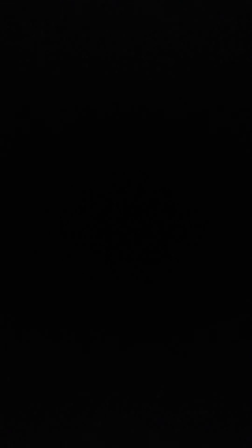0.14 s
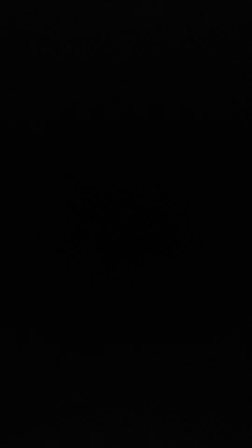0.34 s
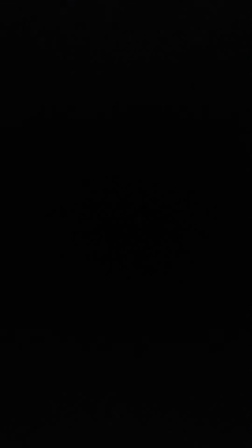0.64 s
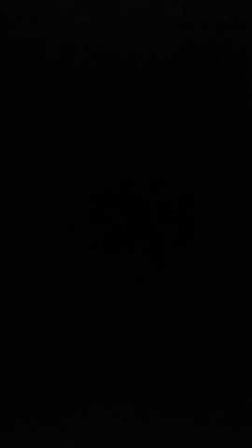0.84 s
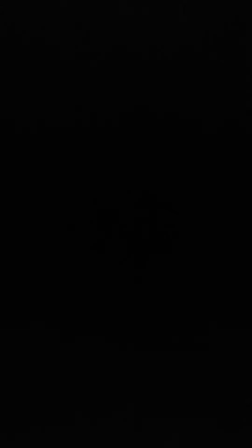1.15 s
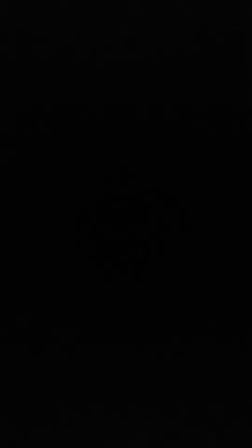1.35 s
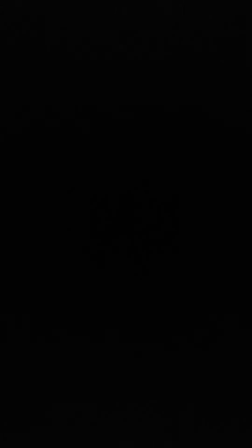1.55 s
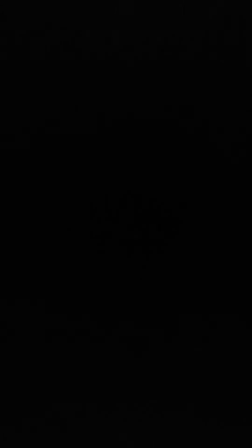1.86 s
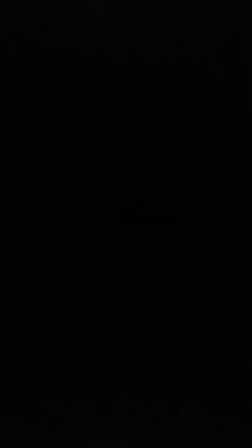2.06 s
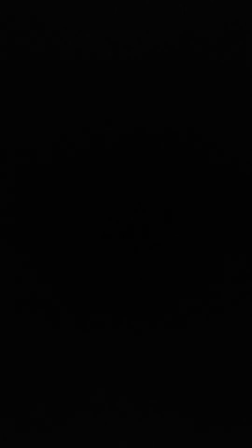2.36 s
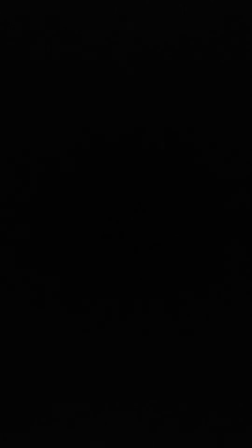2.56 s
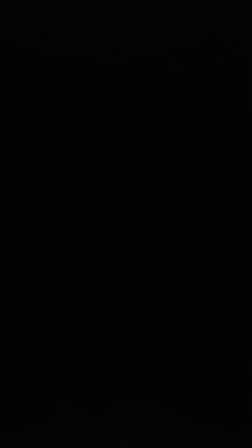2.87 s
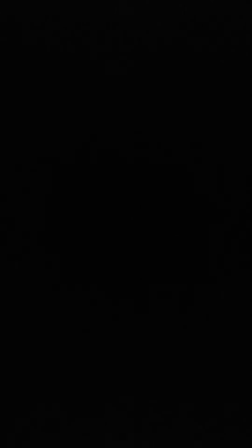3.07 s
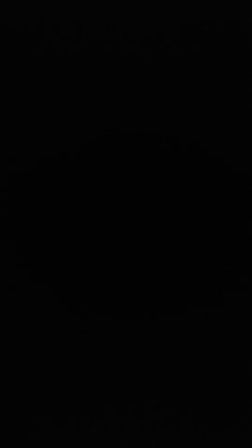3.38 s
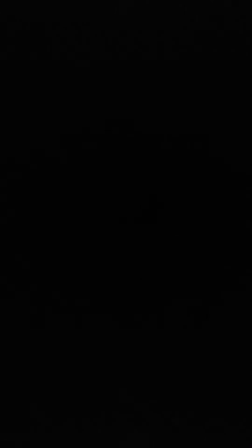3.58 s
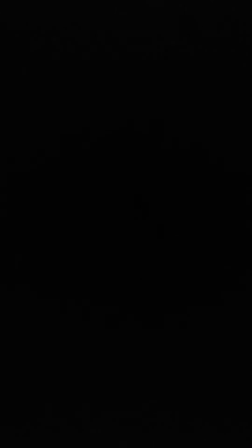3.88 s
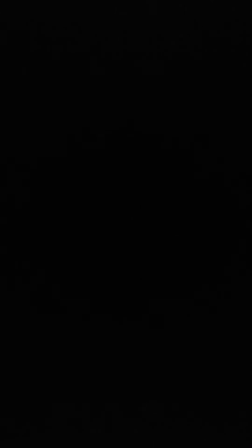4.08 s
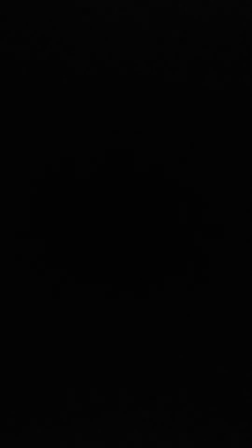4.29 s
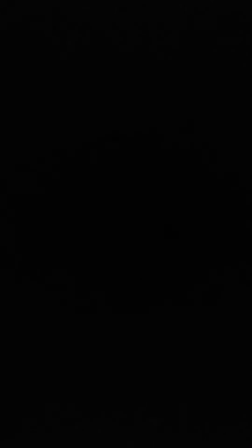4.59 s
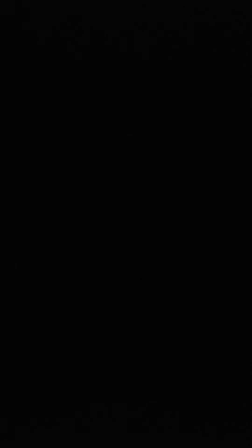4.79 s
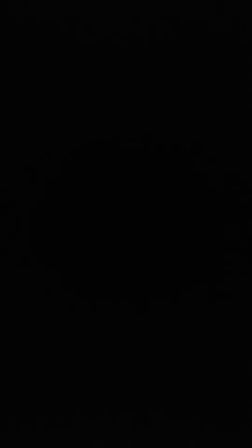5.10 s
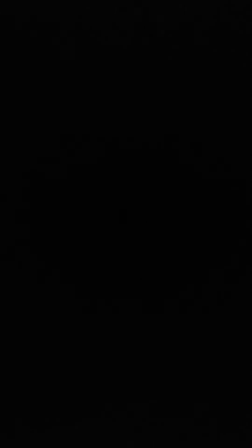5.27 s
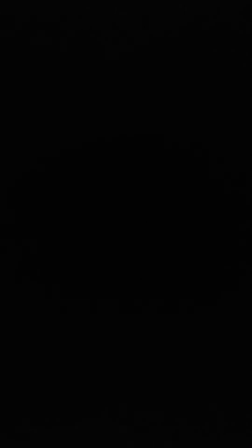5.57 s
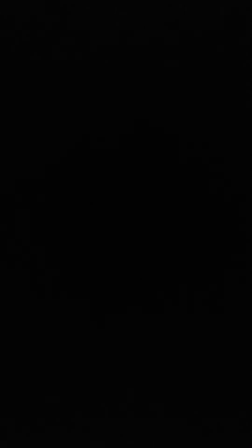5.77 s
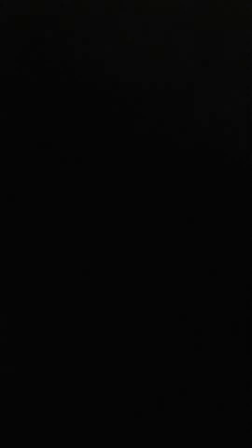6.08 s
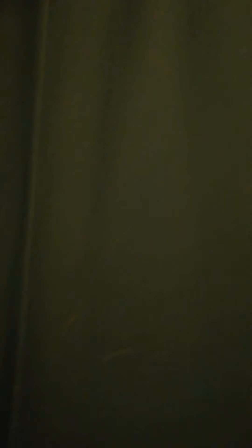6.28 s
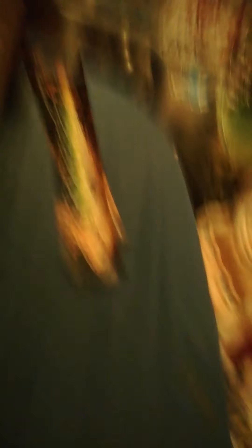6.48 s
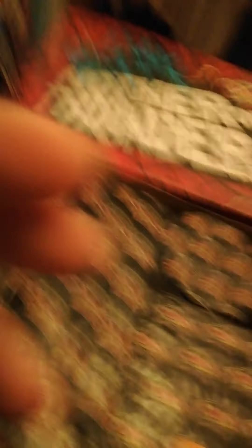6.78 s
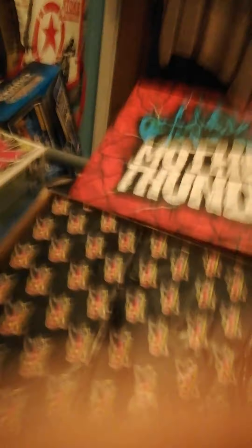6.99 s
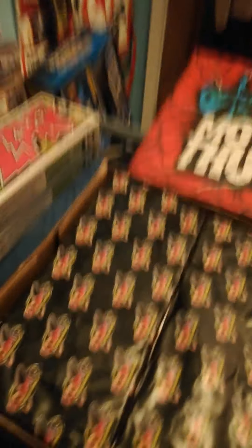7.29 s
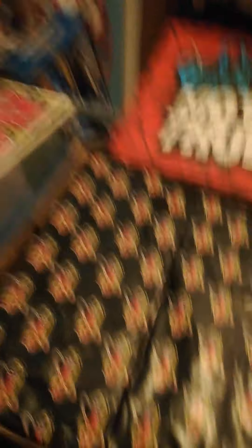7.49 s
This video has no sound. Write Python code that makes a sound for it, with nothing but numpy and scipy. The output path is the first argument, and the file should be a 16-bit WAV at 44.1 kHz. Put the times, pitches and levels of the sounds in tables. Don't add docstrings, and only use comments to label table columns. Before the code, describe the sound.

Very close stereo handling of a cardboard box in a quiet room. A rapid rattle of taps starts on the left, followed by rough scraping, edge knocks and one heavy bouncing thump. Activity thins, then the tight lid creaks in a stuttering run. Fingertips rub and squeak on the right, a few knocks follow, low handling rumbles, and bright nail ticks rattle on the left near the end.

```python
import sys
import numpy as np
from scipy import signal
from scipy.fft import rfft, irfft, next_fast_len
from scipy.io import wavfile
from scipy.ndimage import uniform_filter1d

SR = 44100
rng = np.random.default_rng(int(sys.argv[2]) if len(sys.argv) > 2 else 0)


def bounce(signal):
    frames = np.transpose(np.atleast_2d(signal))
    limited = np.clip(frames, -1, 1)
    pcm = np.round(limited * 32767).astype(np.int16)
    wavfile.write(sys.argv[1], SR, pcm)


def boost(x):
    u = np.asarray(x, float) / 20
    return 10 ** u


N = 337188
TIME = np.arange(N) / SR

PORT_LAG_S, BASS_LAG_S = 0.00068, 0.0009
CENTRE_DB = 9
CARD_PAN_DB = -8


def colour(x, spectrum):
    size = next_fast_len(N)
    hz, db = np.transpose(spectrum)
    f = np.maximum(np.fft.rfftfreq(size, 1 / SR), 1)
    gain = boost(np.interp(np.log(f), np.log(hz), db, left=-60, right=-60))
    y = irfft(rfft(x, size) * gain, size)[..., :N]
    return y / np.sqrt(np.mean(y ** 2))


def below(x, hz):
    return signal.sosfiltfilt(signal.butter(2, hz, fs=SR, output="sos"), x)


def walk(rate):
    k = int(SR / rate)
    return 1.44 * uniform_filter1d(np.repeat(rng.standard_normal(N // k + 1), k), k)[:N]


def grit(per_s, spread_db):
    hit = rng.random(N) < per_s / SR
    size_db = spread_db * np.minimum(rng.exponential(size=N), 3.5)
    return hit * rng.standard_normal(N) * boost(size_db)


def swells(table):
    t = TIME[::64]
    s, rise_s, fall_s, *levels_db = np.transpose(table)[:, :, None]
    shape = boost(-40 * np.where(t < s, (s - t) / np.abs(rise_s), (t - s) / np.abs(fall_s)))
    power = [np.interp(TIME, t, np.sum(boost(2 * db) * shape, axis=0)) for db in levels_db]
    return np.array(power) + 1e-11


def ring(modes, t, chance):
    hz, db, t60 = np.transpose(modes)[:, :, None]
    detune, scatter = chance[:, :len(modes), None]
    fading = boost(db + 4 * scatter - 60 * t / t60)
    y = np.sum(fading * np.sin(2 * np.pi * hz * (1 + 0.05 * detune) * t), axis=0)
    return y / np.max(np.abs(y))


def lag_of(pan_db):
    return PORT_LAG_S * np.tanh((CENTRE_DB - pan_db) / 0.93)


def card_lag(side):
    return PORT_LAG_S * np.tanh(8 * side)


def ports(own, lag_s, alike):
    alike = np.clip(alike, 0, 1)
    shared = [np.interp(TIME - side * lag_s / 2, TIME, own[0]) for side in (1, -1)]
    return alike * np.array(shared) + np.sqrt(1 - alike ** 2) * np.array(own[1:])


def sides(pan_db):
    g = boost(np.array([pan_db, -pan_db]) / 2)
    return g * np.sqrt(2 / np.sum(g ** 2, axis=0))


def add(out, s, pair, lag_s):
    for side, sound in enumerate(pair):
        i = max(int((s + (0.5 - side) * lag_s) * SR), 0)
        out[side, i:i + len(sound)] += sound[:N - i]


# (from time [s], bearing [-1 by the left port to 1 by the right])
PLACES = [(0, -.6), (.24, .7), (.33, -.55), (.6, -.2), (.83, .05), (.99, .5), (1.06, .05), (1.36, .8),
          (1.81, -.4), (1.86, .85), (2.15, -.5), (2.66, -.2), (3.0, .8), (3.67, 1), (4.8, 0), (5.2, .8),
          (5.85, 1), (6.0, .5), (6.95, -1), (7.3, .5)]


def bearing():
    s, side = np.transpose(PLACES)
    return uniform_filter1d(side[np.searchsorted(s, TIME, "right") - 1], SR // 50)


# (time [s], rise [s per 20 dB], fall [s per 20 dB], scrape level [dB], hiss level [dB])
SLIDES = [(0.05, 0.012, 0.2, -34.5, -44.5), (0.087, 0.069, 0.018, -48.9, -32.6),
          (0.152, 0.064, 0.025, -45.4, -41.1), (0.269, 0.028, 0.1, -32.0, -29.6),
          (0.36, 0.015, 0.023, -44.0, -33.1), (0.409, 0.032, 0.068, -29.0, -30.2),
          (0.531, 0.03, 0.09, -34.0, -44.5), (0.59, 0.42, 0.031, -50.6, -40.5),
          (0.688, 0.035, 0.16, -27.0, -33.8), (0.808, 0.03, 0.234, -33.0, -24.7),
          (0.925, 0.22, 0.09, -41.0, -23.0), (1.002, 0.01, 0.059, -30.6, -47.8),
          (1.103, 0.09, 0.137, -31.0, -24.4), (1.232, 0.22, 0.2, -40.1, -35.4),
          (1.469, 0.12, 0.157, -57.7, -49.2), (1.654, 0.03, 0.14, -53.8, -50.3),
          (2.389, 0.057, 0.037, -45.5, -42.9), (2.508, 0.023, 0.306, -50.6, -45.3),
          (7.156, 0.274, 0.292, -72.0, -57.0)]
# (time [s], rise [s per 20 dB], fall [s per 20 dB], scrape [dB], hiss [dB])
DRAGS = [(1.756, 0.012, 0.086, -33.1, -41.8), (1.829, 0.006, 0.075, -34.4, -42.3),
         (1.891, 0.062, 0.047, -38.3, -55.1), (2.204, 0.023, 0.067, -49.9, -48.2),
         (2.243, 1.318, 0.778, -60.6, -60.7), (2.677, 0.2, 0.083, -37.0, -38.6),
         (2.755, 0.45, 0.049, -45.0, -43.0), (3.391, 0.005, 0.14, -33.0, -47.4),
         (3.407, 0.014, 0.035, -43.8, -39.7), (3.47, 0.1, 0.9, -48.5, -70.0),
         (3.63, 0.5, 0.12, -46.5, -60.0), (4.934, 0.011, 0.078, -42.0, -50.1),
         (4.971, 0.043, 0.079, -52.5, -48.3), (5.092, 0.03, 0.07, -36.0, -33.4),
         (5.309, 0.056, 0.077, -55.9, -48.7), (5.393, 3.0, 3.0, -62.0, -75.0),
         (7.098, 0.01, 0.006, -37.0, -68.0), (7.243, 0.099, 0.017, -63.2, -50.2)]
# (time [s], rise [s per 20 dB], fall [s per 20 dB], scrape level [dB], hiss level [dB])
STROKES = [(3.731, 0.158, 0.205, -52.2, -48.0), (3.915, 0.07, 0.07, -41.5, -47.0),
           (4.055, 0.035, 0.066, -38.0, -39.8), (4.229, 0.058, 0.147, -51.8, -48.4),
           (4.405, 0.024, 0.143, -45.7, -48.3), (4.45, 0.046, 0.108, -41.7, -62.6),
           (4.565, 0.089, 0.019, -44.2, -47.6), (5.816, 0.142, 0.079, -40.5, -49.6),
           (5.914, 0.035, 0.09, -34.0, -47.9), (5.948, 0.034, 0.036, -34.6, -37.6),
           (6.054, 0.045, 0.231, -47.4, -46.4), (6.716, 0.219, 0.749, -58.3, -56.2),
           (7.454, 0.045, 0.389, -57.7, -52.0), (7.616, 0.04, 0.418, -60.0, -46.5)]
SLIDE_PAN_DB, DRAG_PAN_DB, STROKE_PAN_DB = 10.5, 8, -7.5


def hands():
    slide, drag, stroke = swells(SLIDES), swells(DRAGS), swells(STROKES)
    total = slide + drag + stroke
    pull = SLIDE_PAN_DB * slide[1] + DRAG_PAN_DB * drag[1] + STROKE_PAN_DB * stroke[1]
    scrape_db, hiss_db = 10 * np.log10(total)
    return scrape_db, hiss_db, pull / total[1]


# (time [s], length [s], treble change [dB])
CONTACTS = [(0.424, 0.027, -1), (0.503, 0.13, -10.5), (0.709, .07, -0.5), (0.815, 0.033, -4.5),
            (1.109, .05, -7.5), (1.17, 0.077, 1.5), (1.742, 0.017, -32), (1.798, 0.028, 2.5),
            (1.868, .07, -11), (2.355, 0.088, -4.5), (2.547, 0.21, 0.5), (3.53, 0.039, -19), (3.9, .04, 2),
            (4.39, 0.076, -4), (5.741, 0.094, -7), (5.892, 0.11, -6.5)]


def contact(x):
    db = sum(change * ((TIME > s) & (TIME < s + length_s)) for s, length_s, change in CONTACTS)
    band = signal.butter(3, (1900, 7000), "band", fs=SR, output="sos")
    treble = signal.sosfiltfilt(band, x)
    return x + treble * (boost(uniform_filter1d(db, SR // 400)) - 1)


# (frequency [Hz], level [dB per Hz])
SCRAPE = [(240, -1), (400, 4), (562, -0.5), (1160, -2), (1390, -4.5), (1590, -5.5), (2340, -6.5),
          (2940, -9), (4470, -13), (6000, -21), (7800, -25), (13200, -120)]
# (frequency [Hz], level [dB per Hz])
HISS = [(2650, -12.5), (4500, -14), (6270, -11.5), (8590, -5.5), (9900, -1.5), (10300, 0.5), (11100, -4.5),
        (15500, -23.5), (16200, -54), (16500, -62)]


def rubbing(scrape_db, hiss_db, pan_db, side):
    pressure_db = 1.57 * walk(45)
    scrape = ports([colour(grit(4000, 2.5), SCRAPE) for _ in range(3)], card_lag(side), 0.55)
    dull = below(scrape, 1700)
    scrape = dull + (scrape - dull) * boost(0.24 * np.minimum(pan_db, 6.0))
    low = below(scrape, 620)
    scrape = scrape - 0.6 * low * np.clip(pan_db - CENTRE_DB, 0, 1)
    hiss = ports([colour(grit(14000, 2.4), HISS) for _ in range(3)], lag_of(pan_db), 0.4)
    scrape = scrape * boost(scrape_db - 1.5 + pressure_db + 1.2 * walk(90))
    scrape = scrape * sides(CARD_PAN_DB * side + 1)
    airy = signal.sosfiltfilt(signal.butter(3, 12200, "high", fs=SR, output="sos"), hiss)
    airy_gain = boost(-0.3 * (pan_db - SLIDE_PAN_DB))
    hiss = (hiss - airy) * sides(pan_db) + airy * sides(0.55 * pan_db) * airy_gain
    hiss = hiss * boost(hiss_db - 2.04 + 1.16 * pressure_db + 1.16 * walk(120))
    return contact(scrape) + hiss


# (time [s], length [s], start pitch [Hz], end pitch [Hz], level [dB])
SINGS = [(.047, 0.063, 900, 1600, -38), (.105, 0.057, 1500, 1300, -45), (.0365, 0.0048, 4500, 4300, -27),
         (0.41, 0.063, 1490, 1150, -34), (0.515, 0.063, 1270, 920, -37), (0.62, 0.049, 2000, 2400, -35.5),
         (0.679, 0.04, 1900, 1200, -34), (0.808, 0.034, 1050, 1250, -30.5), (1.108, 0.045, 1250, 1110, -33),
         (1.109, 0.007, 3900, 3600, -31.5), (1.241, 0.015, 1310, 1320, -44),
         (1.755, 0.033, 2900, 3620, -40), (1.81, 0.025, 3000, 2750, -53), (1.887, 0.0434, 1196, 1500, -53),
         (3.427, 0.285, 2800, 2800, -53), (4.48, 0.044, 3300, 3600, -51.5), (4.535, .025, 997, 2110, -48.5),
         (2.56, .24, 5000, 6000, -50), (5.09, 0.065, 6500, 6500, -43), (4.1, .1, 1300, 1400, -53.5),
         (1.01, 0.046, 3200, 2600, -39), (3.7, 0.067, 504, 550, -43), (5.765, 0.077, 704, 1505, -52),
         (5.904, 0.024, 1000, 1900, -37.5), (5.933, .03, 1600, 1000, -37), (6.19, 0.054, 520, 460, -48.5),
         (5.078, 0.047, 1400, 1340, -42), (4.92, 0.026, 850, 810, -44), (4.942, 0.054, 2800, 3200, -49),
         (5.311, 0.069, 380, 422, -49.5), (5.57, .02, 710, 600, -53), (5.645, 0.026, 570, 1500, -51),
         (5.088, 0.047, 3200, 2600, -45), (.258, 0.053, 3300, 3000, -36.5)]


def sings(side):
    width, attack = 0.55, 0.12
    out = np.zeros((2, N))
    fibres = grit(3000, 2.0) + 1j * grit(3000, 2.0)
    for s, length_s, start_hz, end_hz, db in SINGS:
        u, i = TIME[:int(length_s * SR)] / length_s, int(s * SR)
        pole = np.exp(-np.pi * width * start_hz / SR)
        clicks = fibres[max(i - 800, 0):i + len(u)]
        slow = signal.lfilter([1], [1, -2 * pole, pole ** 2], clicks)[-len(u):]
        turns = np.cumsum(start_hz + (end_hz - start_hz) * u) / SR
        tone = np.real(slow * np.exp(2j * np.pi * turns))
        shape = np.minimum(u / attack, 1) * (1 - u ** 2)
        gains = boost(db) * sides(CARD_PAN_DB * side[i])[:, None]
        add(out, s, gains * shape * tone / np.std(tone), card_lag(side[i]))
    return out


# (time [s], length [s], top slip rate [Hz], level [dB])
SKIDS = [
    (3.713, 0.056, 1004, -42),
    (3.875, 0.078, 651, -39.5),
    (4.025, 0.077, 1118, -38.5),
    (4.19, 0.053, 890, -43.5),
    (4.388, 0.1, 1302, -49),
    (4.528, 0.042, 1600, -52.5),
    (6.099, 0.075, 169, -36),
    (6.982, 0.017, 331, -42.5),
]


def skids():
    out, unrest = np.zeros((2, N)), walk(500)
    for s, length_s, top_hz, db in SKIDS:
        u = TIME[:int(length_s * SR)] / length_s
        wobble = unrest[int(s * SR):][:len(u)] * np.sqrt(top_hz / 1000)
        speed = np.sin(np.pi * (0.15 + 0.76 * u))
        phase = 2 * np.pi * np.cumsum(top_hz * speed * (1 + 0.07 * wobble)) / SR
        slips = np.sin(phase) + 0.2 * np.sin(2 * phase)
        buzz = slips * np.sin(np.pi * u) ** 0.5 * boost(db + 3.0 * wobble[::-1])
        add(out, s, sides(-10.0)[:, None] * buzz, PORT_LAG_S)
    return out


# (time [s], peak level [dB])
CREAKS = [(3.3907, -23), (3.4054, -30), (3.4194, -34), (3.4364, -35), (3.4544, -35), (3.476, -34),
          (3.5024, -35), (3.5224, -33), (3.537, -34), (3.5578, -35), (3.5774, -35), (3.6027, -32),
          (3.6194, -41), (3.6391, -31)]
# (frequency [Hz], level [dB], time to fade 60 dB [s])
LID = [(408, 9.5, 0.032), (716, 0, 0.016), (1390, 2.5, 0.016), (2300, -5, 0.008), (2850, 4, 0.0084),
       (3320, -4, 0.016)]


def creaks():
    out, t = np.zeros((2, N)), TIME[:SR // 30]
    chance = 0.22 * rng.standard_normal((len(CREAKS), 2, 8))
    for (s, db), luck in zip(CREAKS, chance):
        snap = np.minimum(t / 0.0004, 1) * ring(LID, t, luck)
        add(out, s + 0.001, boost(db + 8) * sides(-2.5)[:, None] * snap, PORT_LAG_S)
    return out


# (time [s], peak level [dB], pitch [Hz], loss per bounce [dB])
JOLTS = [
    (.259, -20.5, 230, 7.5),
    (.39, -26, 188, 1),
    (1.101, -6, 190, 2.5),
    (2.371, -31.5, 172, 2.5),
    (2.688, -17.5, 172, 6.5),
    (3.3922, -24, 310, 3.5),
    (4.944, -36.5, 192, 1),
]
# (time [s], peak level [dB], pitch [Hz])
BUMPS = [(0.0232, -18, 210), (0.0336, -23.5, 222), (.039, -20.5, 240), (0.0442, -20, 261),
         (1.297, -29.5, 230), (1.328, -30, 258), (1.489, -36, 335), (1.607, -41, 110), (6.602, -44.5, 250),
         (4.957, -35, 150), (4.981, -34, 170), (.423, -25, 220), (.52, -32, 102), (0.65, -22, 112),
         (.8415, -21, 170), (.862, -18.5, 115), (.876, -24, 125), (.91, -27, 200), (.815, -21, 210),
         (.936, -22, 169), (1.082, -12, 190), (1.814, -25, 302), (1.83, -29, 294), (3.6815, -25, 117),
         (3.726, -30, 193), (4.04, -31.5, 175), (4.196, -31, 125), (4.4473, -18.5, 148), (4.455, -23, 170),
         (5.132, -36, 185), (5.349, -36, 217.8), (5.589, -31, 97), (5.708, -30.5, 81.5),
         (5.923, -21.5, 141), (5.951, -27.5, 144), (6.055, -29.5, 168), (6.04, -32, 165), (5.73, -37, 148),
         (.7075, -25, 199), (1.7519, -25, 234), (1.762, -20.5, 244), (1.772, -25, 280), (1.782, -28, 260),
         (1.793, -28, 250), (1.879, -25, 280), (1.888, -23, 204), (3.541, -23, 260), (2.694, -24.5, 260),
         (6.986, -34, 400), (7.63, -41, 90), (6.198, -32.5, 202), (6.252, -30, 93), (7.048, -28, 216),
         (7.072, -34.5, 220), (7.098, -24.5, 140), (7.487, -42, 118)]


def thumps(side):
    out, k = np.zeros((2, N)), np.arange(5)
    bounce_s, shrink = 0.0135, 0.87
    after_s = bounce_s * (1 - shrink ** k) / (1 - shrink)
    bounces = [(s + after, db - loss_db * j, hz)
               for s, db, hz, loss_db in JOLTS for j, after in enumerate(after_s)]
    luck = rng.standard_normal((len(CREAKS), 2))
    slips = [(s + 0.0017, db + 2 + 1.2 * a, 290 * (1 + 0.15 * b))
             for (s, db), (a, b) in zip(CREAKS[3:], luck)]
    for s, db, hz in BUMPS + bounces + slips:
        turns = hz * TIME[:SR // 8]
        swing = -turns ** 2.24 * np.exp(-turns / 0.25) * np.sin(2 * np.pi * turns)
        sound = boost(db) * swing / np.max(np.abs(swing))
        add(out, s - 0.707 / hz, [sound, sound], BASS_LAG_S * side[int(s * SR)])
    return out


# (time [s], peak level [dB], treble over peak [dB], pitch of struck spot [Hz], left minus right [dB])
KNOCKS = [(0.257, -14.5, -17, 1750, -1), (0.399, -19, 1, 1370, 17), (0.528, -21.5, -13, 1130, 8),
          (0.626, -20, -16, 2170, 1), (0.68, -25.5, -4, 1140, 0.5), (0.811, -20.5, -1, 960, 5),
          (1.002, -25.5, -29, 3020, -0.5), (1.095, -26, -17.5, 1240, 8), (1.113, -24.5, -20, 1220, -0.5),
          (1.484, -40, -15, 706, -0.5), (1.75, -19.5, -31, 710, -24), (1.76, -28, -10, 3020, 0),
          (1.827, -18.5, -21, 785, 15), (2.363, -34.5, -25, 720, 0), (3.391, -24, -19, 2800, 1),
          (3.536, -20, -44, 730, -12), (4.92, -32, -17.5, 1530, -2), (4.935, -24, -21, 1910, -1.5),
          (5.081, -19.5, 0, 1360, 0.5), (5.116, -27.5, -19, 1800, -2), (5.911, -26.5, -30, 1000, -22),
          (1.8263, -29, -14, 2720, 1), (0.413, -20.5, -16, 1433, 8), (0.617, -28, -28, 1500, 1),
          (4.037, -38.5, -13, 900, -8)]
# (frequency [Hz], level [dB], time to fade 60 dB [s])
EDGE = [(420, 19, 0.03), (920, 8, 0.02), (1400, 18, 0.014), (2277, 17, 0.008), (2950, 15, 0.007),
        (3890, 15, 0.007)]


def knocks(side):
    out, t = np.zeros((2, N)), TIME[:SR // 6]
    card = colour(rng.standard_normal((2, N)), SCRAPE)
    air = colour(rng.standard_normal((2, N)), HISS)
    chance = rng.standard_normal((len(KNOCKS), 2, 8))
    for (s, db, treble_db, hz, pan_db), luck in zip(KNOCKS, chance):
        i = int(s * SR)
        torn, fine = card[:, i:i + len(t)], air[:, i:i + len(t)]
        fade_s = np.clip(0.021 + 0.04 * (-19.0 - db), 0.005, 0.13)
        fade = boost(-60 * t / fade_s)
        spot = boost(-60 * t / 0.014) * np.sin(2 * np.pi * hz * t) * (1 + 0.7 * torn[0])
        crack = 1.3 * np.exp(-t / 0.0007) * np.sin(2 * np.pi * 1.6 * hz * t)
        body = 0.6 * crack + 0.26 * ring(EDGE, t, luck) + 0.5 * spot + 0.3 * fade * torn
        bright = 0.64 * boost(treble_db) * fade * fine * sides(pan_db + 6.0)[:, None]
        add(out, s + 0.0003, boost(db) * (body * sides(pan_db)[:, None] + bright), card_lag(side[i]))
    return out


# (time [s], peak level [dB], pitch [Hz], rise [s])
RINGS = [
    (.4118, -17, 3800, .0014),
    (.6172, -24, 255, .006),
    (.6808, -15.5, 212, .006),
    (1.127, -30, 1200, .005),
    (3.52, -36, 160, .035),
    (4.9195, -32, 1450, .002),
    (5.082, -31, 1400, .002),
    (7.031, -38, 240, .006),
]


def rings(side):
    out = np.zeros((2, N))
    for s, db, hz, rise_s in RINGS:
        t, here = TIME[:int(8 * rise_s * SR)], side[int(s * SR)]
        tone = boost(db) * t / rise_s * np.exp(1 - t / rise_s) * np.sin(2 * np.pi * hz * t)
        if hz < 500:
            pan_db, lag_s = 0, BASS_LAG_S * here
        else:
            pan_db, lag_s = CARD_PAN_DB * here, card_lag(here)
        add(out, s, sides(pan_db)[:, None] * tone, lag_s)
    return out


# (time [s], peak level [dB])
TICKS = [(0.0209, -22), (0.0313, -20), (0.0374, -12), (0.0417, -23), (0.3877, -21), (0.4033, -13),
         (0.4123, -14), (2.177, -36), (2.3882, -23), (2.4454, -37), (2.4972, -24), (2.5142, -28),
         (4.2612, -24), (6.1868, -37), (6.3128, -40), (7.0319, -35), (7.0954, -23), (7.1035, -2.5),
         (7.1117, -12), (7.1207, -12), (7.1296, -16), (7.1382, -10), (7.147, -16), (7.1985, -23),
         (7.206, -17), (7.2134, -24)]
# (time [s], peak level [dB])
FAR_TICKS = [
    (5.0816, -16),
    (7.3782, -39),
    (7.4483, -39),
    (7.4855, -29),
]
# (frequency [Hz], level [dB], time to fade 60 dB [s])
PORT = [(5530, -4, 0.002), (6820, -4.5, 0.0058), (9270, 7, 0.0031), (10450, 7.5, 0.0023),
        (13800, -15, 0.0013)]


def ticks():
    out, t = np.zeros((2, N)), TIME[:SR // 60]
    rows = [(*row, 22) for row in TICKS] + [(*row, -7) for row in FAR_TICKS]
    chance = rng.standard_normal((len(rows), 2, 8))
    for (s, db, pan_db), luck in zip(rows, chance):
        snap = ring(PORT, t, luck) * (1 - np.exp(-t / 0.0001))
        snap = snap + 0.27 * np.roll(snap, int(0.00054 * SR))
        gains = sides(pan_db)[:, None] / np.max(sides(pan_db))
        add(out, s, boost(db - 1.0) * gains * snap / np.max(np.abs(snap)), lag_of(pan_db))
    return out


# (time [s], peak level [dB], left minus right [dB])
POPS = [
    (.021, -11, 20),
    (.0315, -12, 20),
    (.0376, -6.5, 20),
    (.0422, -14, 20),
    (.398, -14, 20),
    (4.4443, -19, -10),
    (4.4525, -18, -10),
]


def pops():
    out, t = np.zeros((2, N)), TIME[:SR // 200] - 0.002
    far = -0.5 * np.exp(-(t / 0.00055) ** 2)
    for s, db, pan_db in POPS:
        if pan_db > 0:
            pair = [-np.exp(-np.abs(t) / 0.0002), far]
        else:
            pair = [far, -np.exp(-(t / 0.0003) ** 2)]
        add(out, s - 0.002, boost(db) * np.array(pair), lag_of(pan_db))
    return out


# (time [s], rise [s per 20 dB], fall [s per 20 dB], rumble level [dB])
PUSHES = [(0.05, 0.4, 0.2, -34.0), (0.004, 2, 3, -40.0), (0.282, 0, 0.2, -34), (0.548, 0.236, 0.3, -34),
          (0.676, 0.05, 0.33, -29.5), (0.825, 0.1, 0.47, -31.5), (1.104, 0.13, 0.13, -23),
          (1.238, 0.248, 0.534, -38), (1.865, 0.153, 0.15, -32), (2.282, 0.198, 0.052, -42),
          (2.361, 0.06, 0.06, -32), (2.531, 0.12, 0.36, -38), (2.685, -0.06, 0.1556, -29.5),
          (3.11, 0.1, 0.3, -52.5), (3.416, 0.03, 0.9, -37.5), (3.75, 0.26, 0.1, -34.9),
          (3.915, 0.057, 0.25, -35), (4.06, 0.05, 0.3, -39.5), (4.26, 0.15, 0.21, -43.5),
          (4.48, 0.18, 0.14, -39), (4.955, 0.06, 0.4, -41), (5.71, 0.5, 1, -39), (5.924, 0.1, 0.2, -33.5),
          (6.289, 0.54, 0.03, -38.1), (6.37, -0.2, -0.04, -42), (6.53, 0.4, 0.05, -47),
          (6.72, -1.1, 0.3, -46.0), (7.043, -0.3, 0.27, -47), (7.27, 0.15, 0.5, -53.5),
          (7.64, 0.083, 4, -43)]
# (frequency [Hz], level [dB per Hz])
RUMBLE = [(12, -3.5), (20, 6), (59, 9), (145, 7), (348, -0.5), (475, -17.5), (528, -13), (560, -68),
          (700, -21.5), (910, -6), (1540, -120)]


def flexing(side):
    lift_s, grip_hz, grip_db = 5.4, 97, 4
    rumble_db = 10 * np.log10(swells(PUSHES)[0])
    own = np.array([colour(grit(1500, 2.0), RUMBLE) * boost(1.5 * walk(30)) for _ in range(3)])
    deep = signal.sosfilt(signal.butter(2, grip_hz, fs=SR, output="sos"), own)
    own = np.where(TIME > lift_s, boost(grip_db) * deep + 0.35 * own, own)
    return boost(rumble_db - 2.5) * ports(own, BASS_LAG_S * side, 0.99)


# (frequency [Hz], level [dB per Hz])
ROOM = [(12, -54), (20, -20), (117, -11), (258, -10.5), (297, -12), (750, -20.5), (1320, -11.5),
        (2580, -22), (15200, -37.5), (16500, -51)]
# (frequency [Hz], level [dB])
HUM = [(118.4, -73), (231.5, -72), (296.1, -74), (409.1, -72)]


def room():
    room_db = -59.5
    air = colour(rng.standard_normal((2, N)), ROOM) * boost(room_db + 1.5 + 0.48 * walk(1.6))
    bass = below(air, 226)
    hum = sum(np.sqrt(2) * boost(db + 0.67 * walk(18.0)) * np.sin(2 * np.pi * hz * TIME) for hz, db in HUM)
    lifted = np.sqrt(2) * boost(-68 + 3 * walk(6)) * np.sin(2 * np.pi * 350 * TIME)
    return air - bass + bass[0] + np.where(TIME > 6.15, lifted + 0.5 * hum, hum)


def scene():
    scrape_db, hiss_db, pan_db = hands()
    side = bearing()
    rubs = rubbing(scrape_db, hiss_db, pan_db, side) + sings(side) + skids()
    hits = creaks() + thumps(side) + contact(knocks(side)) + rings(side) + ticks() + pops()
    return rubs + hits + flexing(side) + room()


def band_limit(x):
    return signal.sosfilt(signal.butter(12, 16820, fs=SR, output="sos"), x)


def record(dry):
    top = signal.ellip(8, 0.2, 70, 16400, fs=SR, output="sos")
    mix = signal.sosfilt(top, dry)
    return band_limit(mix)


dry = scene()
out = record(dry)
bounce(out)
```